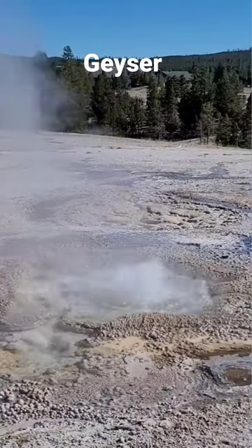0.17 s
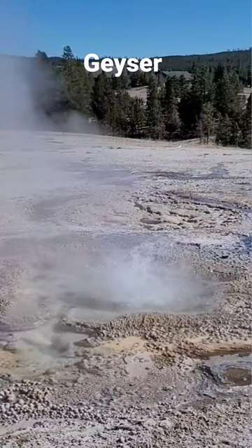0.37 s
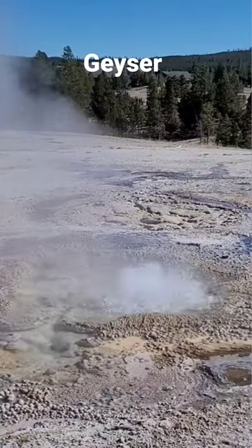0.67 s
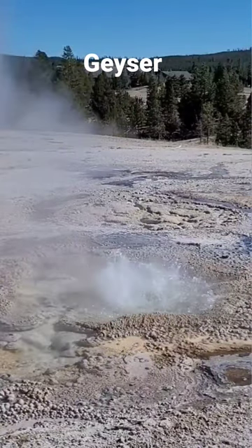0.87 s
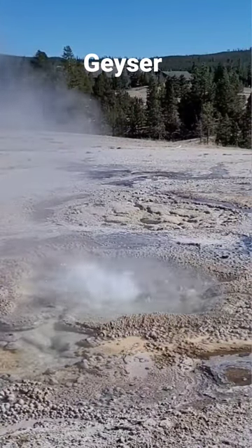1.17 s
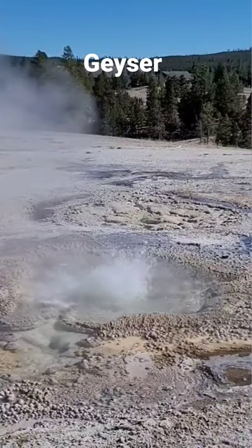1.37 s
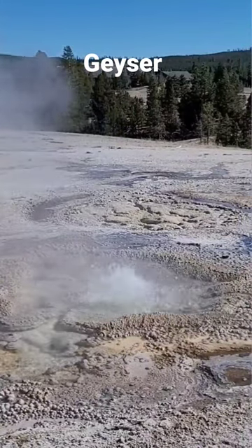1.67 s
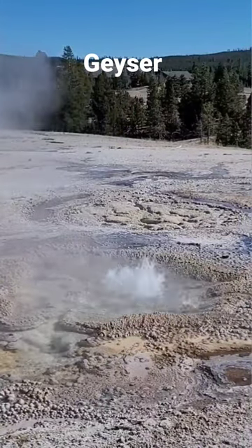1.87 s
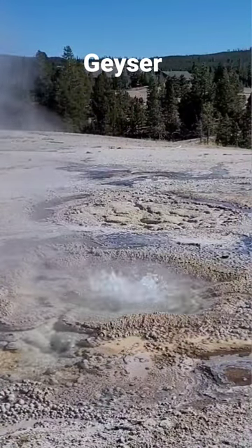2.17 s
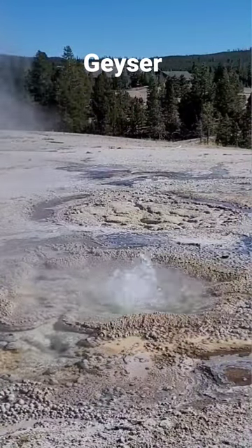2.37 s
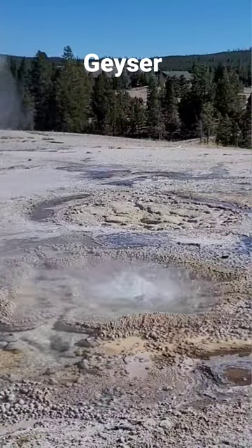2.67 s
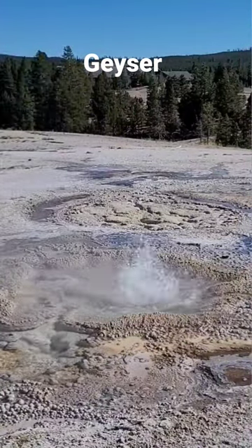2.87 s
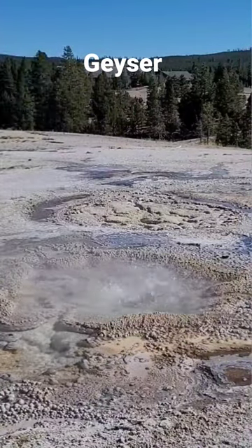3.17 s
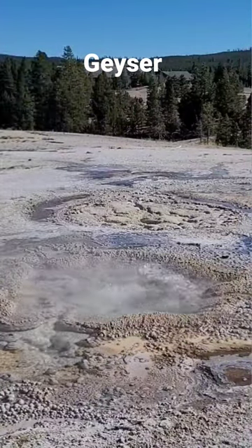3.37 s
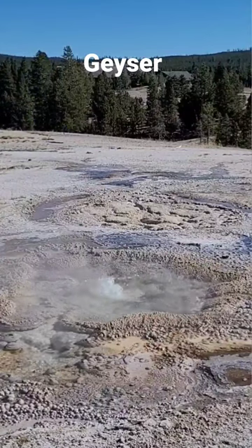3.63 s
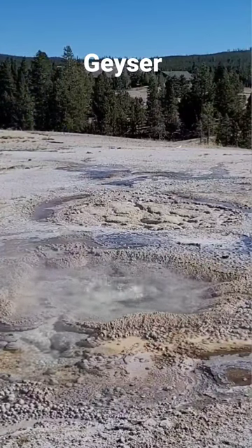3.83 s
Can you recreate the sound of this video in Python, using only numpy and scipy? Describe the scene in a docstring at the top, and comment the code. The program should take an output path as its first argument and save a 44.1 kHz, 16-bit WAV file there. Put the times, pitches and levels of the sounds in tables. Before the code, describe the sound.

Churning geyser water splashes, hisses and glugs in weakening bursts, with low wind thumps at first.

```python
"""A small geyser boils up in its pool a few metres ahead, outdoors, in surges that die down.
Thrown water splashes and hisses: banded noise for the rush, ringing grains for its drops.
Big bubbles gurgle as low ringing grains, lone ones glug with rising pitch, and drops smack the surface.
A falling breeze buffets the two microphone ports, each in its own way: low swings, rumble and flutter."""
import sys
import numpy as np
from scipy import signal
from scipy.io import wavfile

SR = 44100
rng = np.random.default_rng(int(sys.argv[2]) if len(sys.argv) > 2 else 0)


def persist_wave(psi):
    """Save psi, clipped to +-1, as 16-bit WAV."""
    counts = np.round(np.clip(psi, -1, 1) * 32767).astype(np.int16)
    wavfile.write(sys.argv[1], SR, np.atleast_2d(counts).T)


def gain_from_decibels(decibels):
    """Convert decibel values to linear amplitude factors."""
    exponent = np.asarray(decibels, float) / 20
    return 10 ** exponent


N = 176400  # samples: 4 s


def rms_one(x):
    """Scale to an average strength (rms) of 1."""
    return x / np.sqrt(np.mean(x ** 2) + 1e-20)


def in_time(rows):
    """Draw each column of a table as straight lines in time."""
    start_s, *columns = np.transpose(rows)
    return np.array([np.interp(np.arange(N) / SR, start_s, column) for column in columns])


def at_hz(points, hz):
    """Read a table at one pitch, along a log-frequency axis."""
    table_hz, values = np.transpose(points)
    return np.interp(np.log(hz), np.log(table_hz), values)


def drift(rate_hz):
    """Slow random wander of spread 1: noise smoothed twice, one value every 40 samples."""
    r = np.exp(-2 * np.pi * rate_hz * 40 / SR)
    noise = rng.standard_normal(N // 40 + 2002)
    slow = signal.lfilter([1], [1, -2 * r, r * r], noise)[2000:]  # skip the settling
    return np.interp(np.arange(N) / 40, np.arange(len(slow)), rms_one(slow))


def ring(clicks, hz, cycles):
    """A resonator: a unit click rings at about height 1 and dies by 60 dB in so many cycles."""
    r = gain_from_decibels(-60 * hz / (cycles * SR))
    w = 2 * np.pi * hz / SR
    # the tiny constant keeps the dying numbers from getting too small
    return signal.lfilter([0, np.sin(w)], [1, -2 * r * np.cos(w), r * r], clicks + 1e-18)


def band_noise(low_hz, high_hz, order):
    """Stereo noise in one band of pitch, different in each channel; rms 1."""
    sos = signal.butter(order, [low_hz, high_hz], "band", fs=SR, output="sos")
    return rms_one(signal.sosfilt(sos, rng.standard_normal((2, N))))


def bands(spectrum, patchy_db, shared, alike=None):
    """Third-octave bands of stereo noise, each flickering partly on its own; rms 1."""
    # How alike left and right are (1 same, 0 unrelated, -1 opposite): pitch_hz, likeness [no unit]
    likeness = [(300, 1), (640, 0.41), (1410, 1), (3100, 0.88), (6810, -0.26), (15000, -0.089)]
    out, together = 0, drift(23)
    first_hz, last_hz = spectrum[0][0], spectrum[-1][0]
    edges = first_hz * 2 ** np.arange(0, np.log2(last_hz / first_hz) + .1, 1 / 3)
    white = rng.standard_normal((2, 2, N))
    for k, (low, high) in enumerate(zip(edges, edges[1:])):
        sos = signal.butter(2, [low, high], "band", fs=SR, output="sos")
        mid, side = signal.sosfilt(sos, white[k % 2])  # neighbouring bands use different noise
        hz = np.sqrt(low * high)
        c = np.clip(at_hz(likeness, hz) if alike is None else alike, -1, 1)
        gain = gain_from_decibels(at_hz(spectrum, hz) + patchy_db * (shared * together + drift(30)))
        out = out + gain * (np.sqrt(1 + c) * mid + np.sqrt(1 - c) * side * [[1], [-1]])
    return rms_one(out)


def grains(per_s, low_hz, high_hz, cycles, uneven_db, wide, tilt, count=16):
    """Random clumped clicks dealt to resonators, each placed a little left or right; rms 1."""
    sizes = gain_from_decibels(uneven_db * np.minimum(rng.exponential(1, N), 4)) * rng.choice([-1, 1], N)
    clumped_per_s = per_s * gain_from_decibels(3.0 * drift(35))
    born = sizes * (rng.random(N) < clumped_per_s / SR)
    born = born * (1 + wide * rng.uniform(-1, 1, N) * [[1], [-1]])
    dealt = rng.integers(0, count, N)
    out = 0
    for k, hz in enumerate(np.geomspace(low_hz, high_hz, count)):
        out = out + (low_hz / hz) ** tilt * ring(born * (dealt == k), hz, cycles)
    return rms_one(out)


def edge_flutter():
    """The breeze flutters across the edge of the right port: narrow, lumpy noise, weak in the left."""
    # Strength of the flutter: start_s, level_db
    edge_table = [(0, -48.5), (.07, -43.5), (.16, -33.5), (.3, -45.5), (.38, -37), (.5, -64), (.7, -60),
                  (.96, -45), (1.015, -31.5), (1.115, -54), (1.135, -25), (1.16, -44.5), (1.37, -41),
                  (1.4, -64), (1.66, -43.5), (1.96, -55), (2.04, -41), (2.12, -66), (2.25, -66)]
    left_db = -11.5  # against the right port
    air = band_noise(284, 517, order=4)
    return gain_from_decibels(in_time(edge_table) + 3.5 * drift(40) + [[left_db], [0]]) * air


def buffets():
    """Each buffet is a swing or two of pressure, sinking in pitch; gives the swings and their outlines."""
    # Single buffets: peak_s, left_level_db, right_level_db, length_s (half height half a length after the peak)
    buffet_table = [(0.02, -28, -26, 0.035), (0.096, -17, -21, 0.032), (0.152, -17, -40, 0.024),
                    (0.191, -14, -24, 0.022), (0.207, -13, -11, 0.03), (0.228, -17, -15, 0.022),
                    (0.246, -13, -16, 0.035), (0.299, -21, -18, 0.035), (0.35, -27, -18, 0.015),
                    (0.367, -22, -15, 0.012), (0.394, -14, -21, 0.024), (0.426, -18, -19, 0.026),
                    (0.475, -26, -27, 0.03), (0.507, -28, -27, 0.025), (0.804, -30, -30, 0.03),
                    (0.852, -23, -36, 0.02), (0.99, -12, -18, 0.032), (1.02, -18, -24, 0.016),
                    (1.068, -14, -14, 0.04), (1.135, -22, -36, 0.02), (1.169, -16, -20, 0.018),
                    (1.197, -14, -19, 0.02), (1.221, -12, -13, 0.035), (1.252, -19, -19, 0.03),
                    (1.274, -24, -21, 0.018), (1.303, -15, -13, 0.035), (1.328, -21, -19, 0.03),
                    (1.384, -19, -31, 0.024), (1.482, -24, -26, 0.031), (1.545, -27, -28, 0.019),
                    (1.584, -24, -27, 0.026), (1.712, -29, -56, 0.037), (1.822, -26, -60, 0.026),
                    (1.894, -27, -46, 0.04), (2.203, -21, -25, 0.022), (2.357, -33, -30, 0.028),
                    (2.517, -30, -34, 0.024), (2.81, -33, -37, 0.02), (3.26, -45, -48, 0.03),
                    (3.583, -44, -50, 0.024), (3.75, -49, -50, 0.03)]
    # Buffets that push one port and pull the other: peak_s
    opposed_s = [0.207, 0.228, 0.35, 0.367, 0.426, 0.99, 1.169]
    middle_hz = 72
    sag = 0.7      # share of the pitch lost over one length
    unlike = 0.2   # cycles by which the ports may differ
    sudden = 1.7   # a buffet rises this much faster than it falls
    spike = 0.23   # share of the octave that sharpens the swing
    t = np.arange(N) / SR
    swings, push = np.zeros((2, N)), np.zeros((2, N))
    chance = rng.random((len(buffet_table), 4))
    for (s, left_db, right_db, length), draw in zip(buffet_table, chance):
        near = slice(max(int((s - .1) * SR), 0), int((s + .1) * SR))
        since = t[near] - s
        steep = np.where(t[near] < s, sudden, 1)
        shape = gain_from_decibels([[left_db], [right_db]]) * np.exp(-np.log(16) * (since / length * steep) ** 2)
        hz = middle_hz * (.85 + .2 * (draw[0] + draw[:2, None]))  # a little apart in the two ports
        cycles = hz * since * (1 - sag * since / length / 2)
        push_or_pull = np.round(draw[2]) / 2
        right_shift = unlike * (draw[3] - .5) + (s in opposed_s) / 2
        turn = 2 * np.pi * (cycles + push_or_pull + right_shift * np.array([[0], [1]]))
        swings[:, near] += shape * (np.cos(turn) + spike * np.sin(2 * turn))
        push[:, near] += shape
    return swings, push


def wind():
    """Swings of pressure, with a lumpy rumble and a flutter that follow both breeze and buffets."""
    # Breeze on the ports, before its lumps: start_s, left_level_db, right_level_db
    breeze_table = [(0, -45, -45), (.06, -32, -60), (.11, -30, -34), (.17, -34, -55), (.22, -31, -33),
                    (.45, -33, -36), (.55, -40, -60), (.6, -36, -60), (.66, -52, -40), (.85, -36, -42),
                    (.9, -33, -52), (.96, -35, -62), (1.0, -30, -32), (1.11, -38, -60), (1.2, -29, -32),
                    (1.29, -38, -36), (1.45, -39, -38), (1.6, -43, -43), (1.66, -39, -65), (1.97, -46, -80),
                    (2.15, -33, -54), (2.22, -37, -43), (2.38, -44, -36), (2.52, -46, -48), (2.6, -47, -70),
                    (2.92, -54, -75), (3, -58, -59), (3.36, -68, -62), (3.76, -60, -67), (4, -62, -78)]
    # Colour of the rumble: pitch_hz, relative_level_db [dB per Hz]
    rumble_colour = [(22, -6), (35, -12), (50, 1.5), (68, -2.5), (110, 1.5), (200, -11), (300, -7.5)]
    swings, push = buffets()
    lumps_db = 2.2 * np.array([drift(30), drift(30)])
    breeze = gain_from_decibels(in_time(breeze_table) + lumps_db)
    rumble = (breeze + 0.2 * push) * bands(rumble_colour, patchy_db=1.0, shared=0.3, alike=0.047)
    flutter_db = [[-17], [-18.5]]  # left, right, against the wind
    flutter = gain_from_decibels(flutter_db) * (breeze + 0.57 * push) * band_noise(158, 388, order=3)
    return swings + rumble + flutter


def smacks():
    """Drops smack the pool: short noisy rings, each with a trail of spatter falling back."""
    # Single drops: start_s, peak_level_db, pitch_hz
    smack_table = [(0.0548, -34, 3100), (0.209, -32, 1510), (0.257, -32.5, 1300), (0.308, -40.5, 7600),
                   (0.714, -36, 990), (1.122, -44, 2120), (1.323, -45, 1880), (1.511, -37.5, 4200),
                   (1.5936, -37, 2180), (1.704, -35, 3570), (1.7842, -31.5, 2070), (1.834, -35, 2200),
                   (1.856, -41, 2250), (1.9653, -40.5, 7000), (2.195, -42, 2900), (2.2542, -37, 1600),
                   (2.3808, -32.5, 1270), (2.455, -42, 3300), (2.6868, -44, 3050), (2.8729, -37.5, 1940),
                   (3.1699, -39, 1890), (3.219, -35.5, 1550), (3.237, -42, 2640), (3.395, -44.5, 2730),
                   (3.409, -42, 2100), (3.4271, -45, 4830), (3.622, -44.5, 1090), (3.821, -50, 870),
                   (3.855, -52, 1430), (3.9095, -48, 2090)]
    attack_s, spatter_share, spatter_s = 0.0012, 0.55, 0.01
    out, t = np.zeros(N + SR), np.arange(SR // 10) / SR
    for s, db, hz in smack_table:
        impact = t / attack_s * np.exp(1 - t / attack_s)
        droplets = rng.exponential(.5, len(t) // 45).repeat(45)  # a new strength every 45 samples
        spatter = spatter_share * np.exp(-t / spatter_s) * droplets
        burst = rng.standard_normal(len(t)) * (impact + spatter)
        hit = ring(burst, hz, cycles=4.5)
        out[int(s * SR):][:len(t)] += gain_from_decibels(db) * hit / abs(hit).max()
    return out[:N]


def glugs():
    """Lone large bubbles: each is a sine that swells, rises in pitch and dies."""
    # Lone bubbles: start_s, level_db (before swell and decay), pitch_hz (at the start)
    glug_table = [(1.368, -32, 600), (1.653, -29, 580), (2.042, -26, 514), (2.066, -25, 660),
                  (2.322, -26, 457), (2.345, -39, 243), (2.373, -19, 474), (2.385, -28, 514),
                  (2.798, -22, 557), (2.803, -24.5, 180), (2.866, -26.5, 477), (2.908, -33, 466),
                  (3.058, -30, 374), (3.221, -30, 473), (3.577, -31.5, 342), (3.735, -43, 503),
                  (3.762, -40, 694)]
    swell_s = 0.0023
    cycles = 4.73  # a glug dies by 30 dB in so many cycles of its first pitch
    rise = 0.1     # half the share by which the pitch rises in that time
    out, t = np.zeros(N + SR), np.arange(SR // 10) / SR
    for s, db, hz in glug_table:
        age = t * hz / cycles
        shape = (1 - np.exp(-t / swell_s)) * gain_from_decibels(-30 * age)
        tone = np.sin(2 * np.pi * hz * t * (1 + rise * age))
        out[int(s * SR):][:len(t)] += gain_from_decibels(db) * shape * tone
    return out[:N]


def gurgling():
    """Overlapping big bubbles: low ringing grains, filtered to dull their attack."""
    # Big bubbles in the pool: start_s, level_db
    gurgle_table = [(0, -56), (.25, -48), (.58, -56), (.72, -41), (1.0, -63), (1.5, -50), (1.95, -60.5),
                    (2.05, -54.5), (2.2, -51.5), (2.29, -51), (2.33, -35), (2.39, -40), (2.42, -46),
                    (2.55, -59), (2.65, -52.5), (2.74, -62.5), (2.8, -43.5), (2.84, -45.5), (2.92, -57.5),
                    (3.0, -55), (3.15, -54.5), (3.23, -51.5), (3.33, -61.5), (3.5, -52.5), (3.67, -70),
                    (3.75, -53), (3.81, -75), (3.92, -56.5), (4, -70)]
    pops = grains(300, 227.6, 610, cycles=14.4, uneven_db=2.0, wide=0.36, tilt=-0.46)
    dull = signal.sosfilt(signal.butter(3, [150, 720], "band", fs=SR, output="sos"), pops)
    return gain_from_decibels(in_time(gurgle_table)) * rms_one(dull)


def splashing():
    """Rush of falling water with drops in it, and the finer spray hissing above."""
    # Vigour of the eruption: start_s, splash_relative_level_db, spray_level_db (against the splash)
    surge_table = [(0, -50.5, -1.5), (.2, -43.5, -9.5), (.3, -44, -8.5), (.44, -48.5, -6), (.5, -57, -1),
                   (.58, -61.5, -1), (.71, -44, -9.5), (.8, -47.5, -5.5), (.92, -47.5, -7),
                   (1.02, -56, 0.5), (1.12, -50.5, -7), (1.25, -52.5, -4.5), (1.45, -51, -5.5),
                   (1.6, -49.5, -2), (1.68, -51, -5.5), (1.78, -47, -5.5), (1.85, -50.5, -3.5),
                   (1.96, -54.5, -2.5), (2.05, -50, -10), (2.2, -56.5, -4), (2.26, -54.5, -3.5),
                   (2.35, -51.5, -12), (2.385, -46, -12), (2.42, -50, -2), (2.47, -47.5, -8.5),
                   (2.55, -55.5, -5), (2.75, -61.5, -3.5), (2.81, -49.5, -12.5), (2.88, -48.5, -7),
                   (2.95, -54.5, -5), (3.1, -61, -2.5), (3.22, -54, -5.5), (3.31, -57, -3.5),
                   (3.41, -56, -3), (3.46, -61.5, -3), (3.55, -60, -5), (3.61, -66.5, -12.5),
                   (3.74, -71, -17), (3.85, -66.5, -9.5), (3.93, -56, -13.5), (4, -69.5, -6)]
    # Colour of the rush: pitch_hz, relative_level_db [dB per Hz]
    splash_colour = [(450, -53), (650, 2.5), (900, -5.5), (1400, -5), (2200, -1.5), (2900, -17),
                     (4500, -31)]
    # Colour of the spray: pitch_hz, relative_level_db [dB per Hz]
    spray_colour = [(1800, -5), (2800, 7.5), (3800, 0.5), (5200, 2.5), (6300, 1.5), (7400, 0.5), (8500, -3),
                    (11500, -3), (15500, 4)]
    splash_db, spray_db = in_time(surge_table)
    drops = grains(600, 785, 2715, cycles=28.0, uneven_db=3.0, wide=0.65, tilt=0.46, count=30)
    rush = bands(splash_colour, patchy_db=0.67, shared=1.5) + gain_from_decibels(1.5) * drops
    droplets = grains(700, 2930, 12440, cycles=19.0, uneven_db=2.0, wide=1.0, tilt=0.17, count=24)
    spray = bands(spray_colour, patchy_db=1.92, shared=0.68) + gain_from_decibels(-5.0) * droplets
    spray_side_db = np.array([[0.3], [-0.3]])  # a touch to the left
    return gain_from_decibels(splash_db - 5.0) * rush + gain_from_decibels(splash_db + spray_db + spray_side_db) * spray


def scene():
    """Water ahead, its splashes and single bubbles a touch to the left, and wind on the ports."""
    water = (splashing() + smacks() + glugs()) * gain_from_decibels([[.4], [-.4]])
    return water + gurgling() + wind() + edge_flutter()


def band_limit(x):
    """A steep low-pass at the top of the band."""
    return signal.sosfilt(signal.butter(12, 15590, fs=SR, output="sos"), x)


def record(dry):
    """The microphone rounds off the peaks and adds a thin, high hiss."""
    rounded = .31 * np.tanh(dry / .31)
    high_pass = signal.butter(2, 6300, "high", fs=SR, output="sos")
    hiss = signal.sosfilt(high_pass, rng.standard_normal((2, N)))
    mix = rounded + gain_from_decibels(-74.5) * hiss
    return band_limit(mix)


dry = scene()
out = record(dry)
persist_wave(out)
```